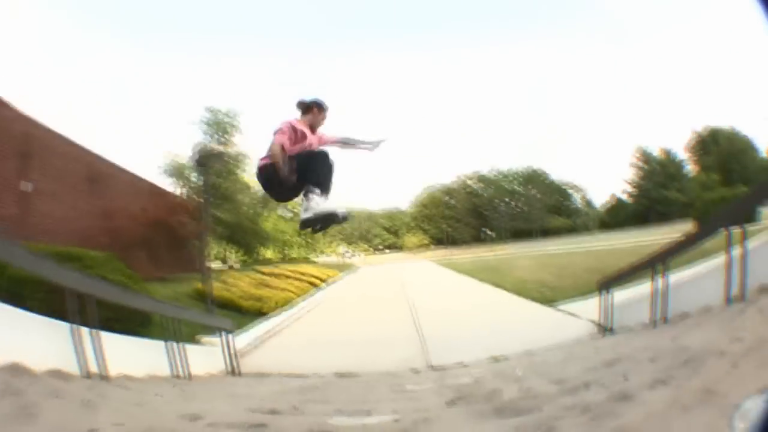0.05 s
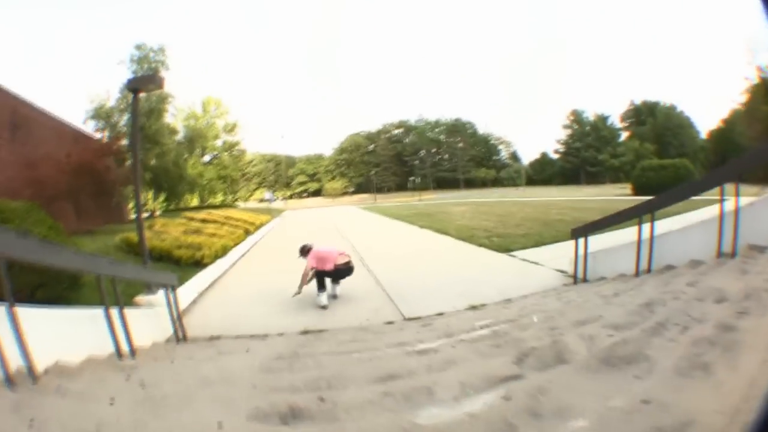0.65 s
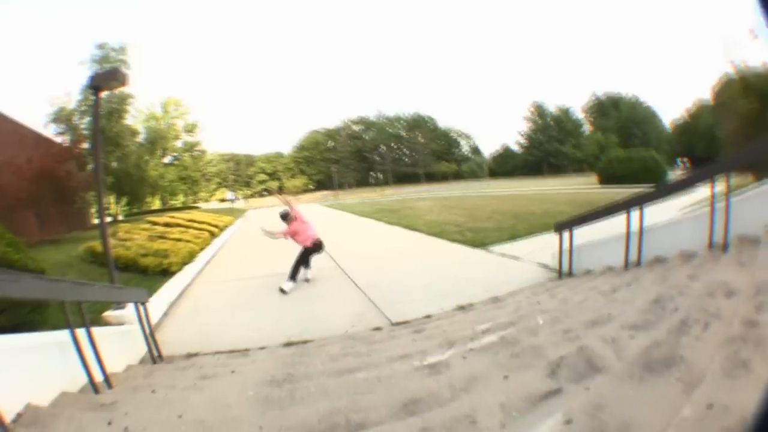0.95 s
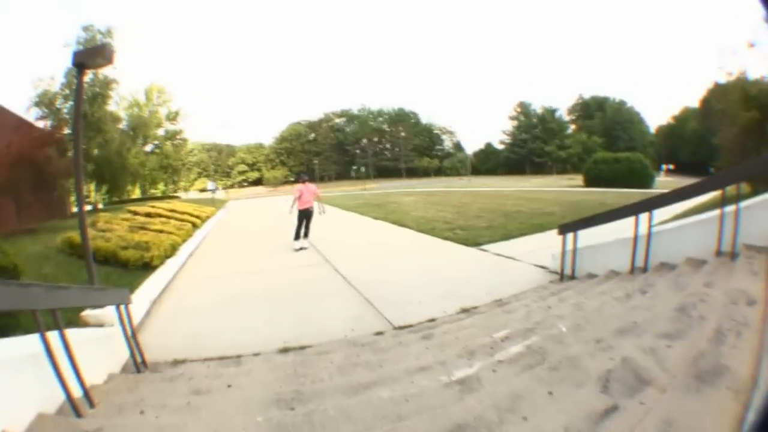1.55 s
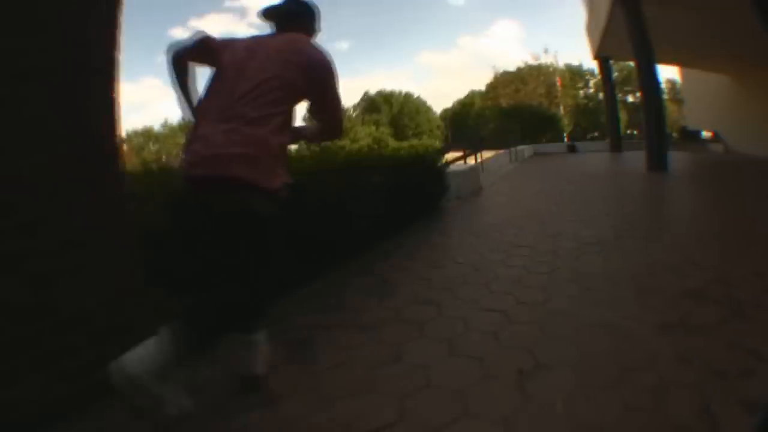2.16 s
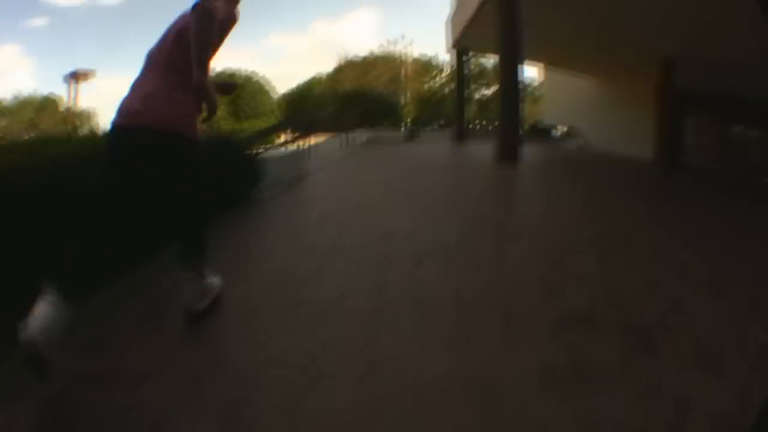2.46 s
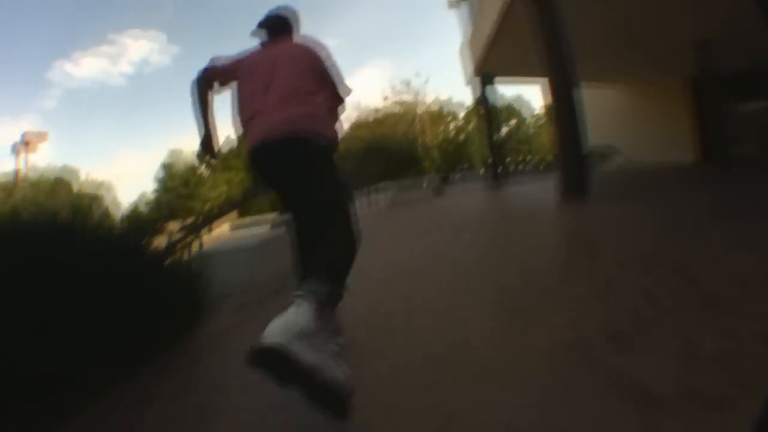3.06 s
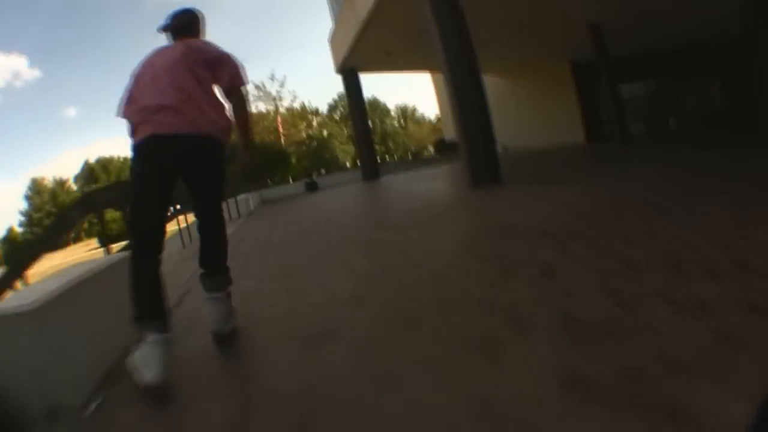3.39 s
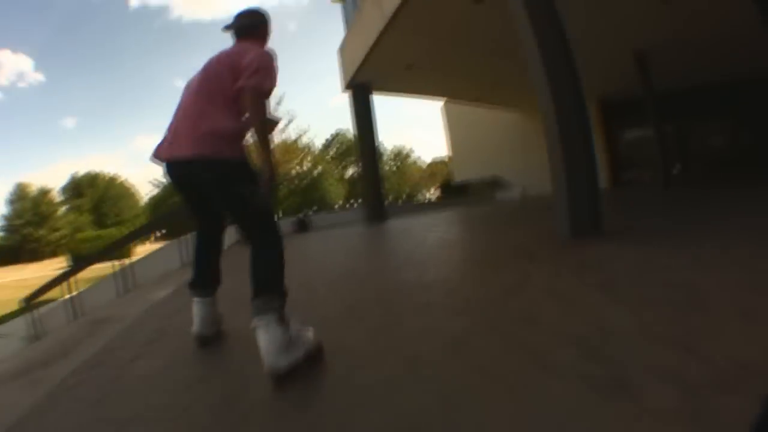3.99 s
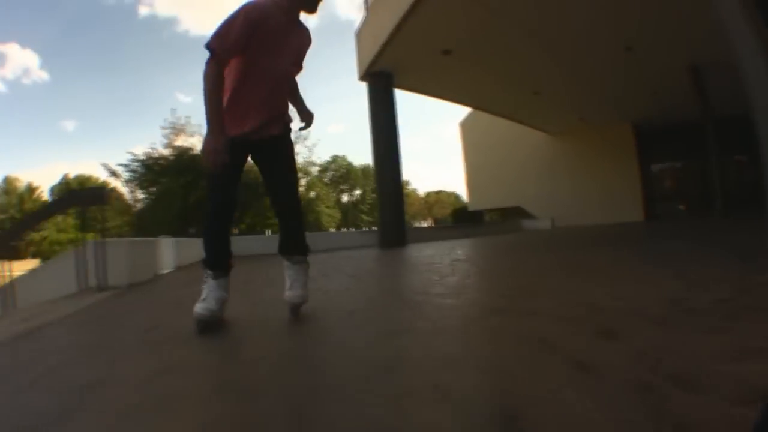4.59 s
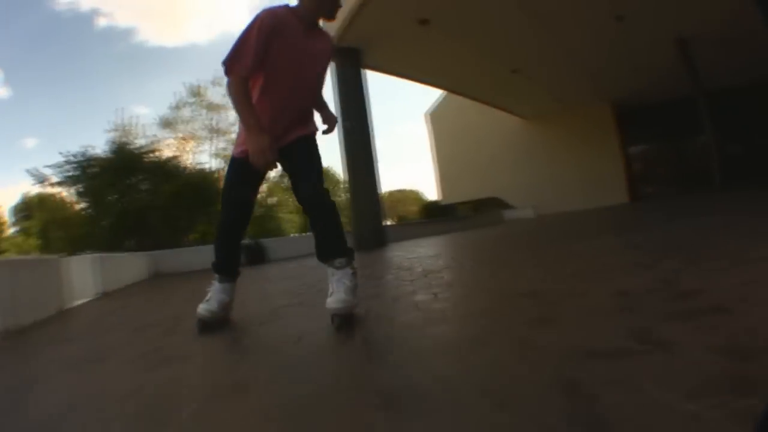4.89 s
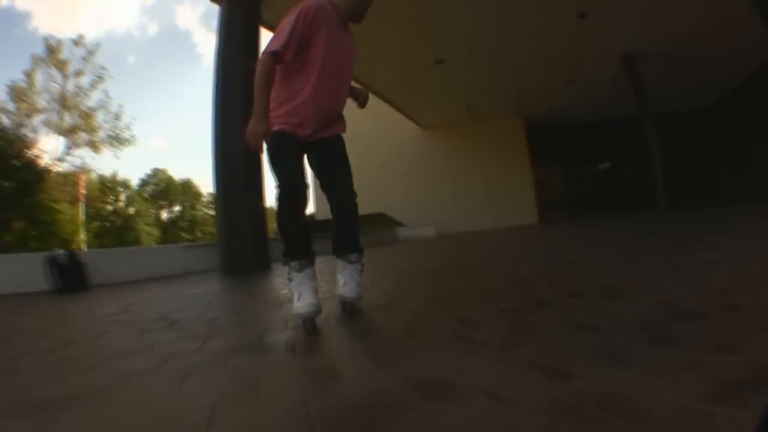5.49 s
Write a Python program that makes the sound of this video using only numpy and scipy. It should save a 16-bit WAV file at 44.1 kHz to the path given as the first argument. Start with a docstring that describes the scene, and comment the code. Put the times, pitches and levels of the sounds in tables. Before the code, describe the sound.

After a hard landing and a short scuff, inline skate wheels fade, then return close, rumbling and clacking over paving joints in gusty air.

```python
"""Skate wheels whirr as an inline skater jumps a flight of concrete steps. He slams down, scuffs a wheel
sideways and rolls away. Then we follow him closely over a paved plaza, where the hard wheels rumble,
knock over joints and crack grit. Puffs of wind buffet each microphone opening on its own,
and the heaviest blows overload the input."""
import sys
import numpy as np
from scipy import signal
from scipy.fft import rfft, irfft, next_fast_len
from scipy.io import wavfile
from scipy.ndimage import map_coordinates

SR = 44100
rng = np.random.default_rng(int(sys.argv[2]) if len(sys.argv) > 2 else 0)


def log_audio(samples):
    """Write samples as a 16-bit WAV file to the path given in sys.argv[1]."""
    # one column per channel
    frames = np.atleast_2d(samples).T
    # limit to full scale, then quantise
    limited = np.clip(frames, -1, 1)
    pcm = np.round(limited * 32767).astype(np.int16)
    wavfile.write(sys.argv[1], SR, pcm)


N = 244314
TIME = np.arange(N) / SR
HIT_TIME = TIME[:SR // 4]
TOUCHDOWN_S, PLAZA_START_S, PUSH_OFF_S = .62, 2.24, 2.278

# tone of a rumbling boot, a clacking frame, a snap at the ground and splintering grit:
# (frequency [Hz], relative level [dB])
RUMBLE_TONE = [(25, -44), (60, -11), (100, -0.5), (200, 4.5), (330, 2.5), (450, -6), (700, -12.5),
               (1500, -57)]
CLACK_TONE = [(150, -12), (450, 13), (900, 8.5), (1400, 6), (1950, 4), (2300, -9.5), (3300, -24),
              (7000, -65)]
SNAP_TONE = [(1500, 7), (2800, 7.5), (4500, -1), (6800, -3.5), (11000, -8.5), (15800, -38)]
SPLINTER_TONE = [(4000, 0), (7000, 1.5), (11500, -0.5), (15800, -24)]
# notes at which a boot rings with weight on it: (pitch [Hz], width [Hz], relative level [dB])
BOOT_NOTES = [(208, 42, -3.5), (408, 86, 2), (633, 77, -0.5), (1035, 86, -9), (1280, 124, -8.5)]


def wheels():
    """Bumps shake boot and frame; the changing load makes rumble, clatter and hiss waver together."""
    # tone of rolling on the steps, the plaza and sand: (frequency [Hz], relative level [dB])
    steps_tone = [(200, -19), (450, 6.5), (750, 11.5), (1100, 9), (1400, 6), (1680, 7), (1900, 6),
                  (2200, -10), (3200, -7), (6000, -39)]
    plaza_tone = [(200, -60), (420, 6.5), (620, 1.5), (950, 2), (1350, -5.5), (1850, -4.5), (2250, -27),
                  (3300, -17), (6000, -73)]
    sand_tone = [(1200, -7.5), (2200, 8), (3100, 1), (4500, -1.5), (5500, -4), (6500, -5), (8000, -7.5),
                 (11000, -8), (13000, -18), (15800, -52)]
    # a skate takes his weight and rumbles: (time [s], length [s], level [dB])
    strides = [(2.28, 0.26, -34.5), (2.71, 0.14, -29), (2.82, 0.047, -32), (2.98, 0.15, -31),
               (3.15, 0.079, -35), (3.24, 0.072, -41.5), (3.58, 0.022, -33), (3.76, 0.0062, -28),
               (3.85, 0.18, -30), (4.26, 0.13, -34), (4.6, 0.1, -31.5), (4.84, 0.94, -34.5)]
    # a turning wheel grinds over sand: (time [s], length [s], level [dB])
    scrapes = [(.67, 0.12, -48), (1.5, 0.035, -46), (1.86, 0.039, -48), (2.4, 0.053, -43),
               (2.8, 0.057, -50)]
    clatter_db = rolling_db()
    load_db = 1.8 * (wobble(45) + .7 * wobble(130))
    slab = stereo(bumps(per_s=600, spread_db=4, texture=1), shape(steps_tone))
    pavers = stereo(bumps(per_s=190, spread_db=4, texture=.7), shape(plaza_tone))
    boots = stereo(bumps(per_s=1400, spread_db=2.5, texture=1), shape(RUMBLE_TONE))
    sand = stereo(bumps(per_s=90, spread_db=4, texture=1.6), shape(sand_tone))
    drive_db = clatter_db + 40  # rumble follows the clatter a little, sand hiss follows it closely
    weight = np.hypot(amp(-47.5 + .25 * drive_db), swells(strides, attack_s=.0026, fade_db_per_s=144))
    grind = np.hypot(amp(-52 + .87 * drive_db), swells(scrapes, attack_s=.01, fade_db_per_s=250))
    rumble = weight * amp(.5 * load_db) * boots
    clatter = amp(clatter_db + load_db) * np.where(TIME < PLAZA_START_S, slab, pavers)
    hiss = grind * amp(.99 * load_db) * sand
    return rumble + clatter + hiss


def rolling_db():
    """Level of the wheels: spinning in the air, coasting into the distance, then driven over the plaza."""
    # how hard the wheels run on the plaza: (time [s], level [dB])
    effort = [(2.25, -30.5), (2.34, -33.5), (2.41, -35), (2.77, -35), (3.17, -47), (3.37, -49.5),
              (3.5, -46.5), (3.74, -37), (4.08, -43.5), (4.24, -42.5), (4.45, -43), (4.79, -41),
              (5.0, -35.5), (5.54, -33.5)]
    start_m, speed_m_per_s = 10.1, 9.4
    flight_db = -37 - 9.5 * TIME  # the free wheels slow down
    distance_m = start_m + speed_m_per_s * np.maximum(TIME - TOUCHDOWN_S, 0)
    coast_db = -37 - 20 * np.log10(distance_m / start_m)
    plaza_db = curves(effort)[0] - .5
    return np.select([TIME < TOUCHDOWN_S, TIME < PUSH_OFF_S], [flight_db, coast_db], plaza_db)


def landing():
    """The wheels slap down and growl up to speed; the loaded boots drone as he crouches."""
    # the wheels' rising growl, and a squeak as one grips: (time [s], pitch [Hz], level [dB])
    growl = [(.612, 225.9, -23), (.619, 264, -6), (.629, 268, -9.5), (.636, 417, -14.5), (.644, 484, -6.5),
             (.652, 613, -14.5), (.662, 640, -22), (.68, 600, -45)]
    squeak = [(.645, 1000, -31), (.67, 1148, -29), (.686, 1230, -23.5), (.71, 1280, -46)]
    # drone of the boots through the crouch: (time [s], level [dB])
    crouch = [(.61, -100), (.622, -7), (.645, -17), (.668, -28.5), (.71, -31.5), (.735, -22.5), (.79, -27),
              (.85, -34), (.905, -32.5), (.935, -46), (1.0, -41.5)]
    # wheel after wheel slaps the concrete: (time [s], level [dB])
    slaps = [(.616, -32), (0.6242, -17.5), (0.6298, -13), (.635, -36.5), (0.638, -28), (0.643, -25),
             (.653, -32.5), (.675, -47)]
    # tone of one slap: (frequency [Hz], relative level [dB])
    slap_tone = [(50, -23), (600, 13), (3300, -0.5), (7000, -3), (15000, -17)]
    grip = stick_slip(growl, jitter=.14, rough_db=2.5) + stick_slip(squeak, jitter=.068, rough_db=5.5)
    drone_db = curves(crouch)[0] - 20.5 * np.maximum(TIME - crouch[-1][0], 0)  # fades after the crouch
    ground = bumps(per_s=1400, spread_db=-4, texture=.68)[0]
    boots = filtered(ground, lambda f: resonances(BOOT_NOTES)(f) / (1 + (f / 2200) ** 4))
    out = np.tile(grip + amp(drone_db) * unit(boots), (2, 1))
    # a brief deep thud as the landing overloads the input
    add(out, .618, amp(-23) * ring(hz=48, decay_s=.05, attack_s=.006))
    for s, slap_db in slaps:
        add(out, s, amp(slap_db) * burst(shape(slap_tone), decay_s=.015, attack_s=.00027))
    add(out, .622, amp(-31) * burst(shape(SNAP_TONE), decay_s=.16, attack_s=.0026))  # the frames rattle
    return out


def knocks():
    """Each blow thumps the boot, clacks the frame and snaps at the ground, which rings wheel and frame."""
    # wheels striking joints and ground:
    # (time [s], thump [dB], clack [dB], snap [dB], clack pitch [Hz], decay [s])
    blows = [(0.102, -36.5, -26.5, -44, 1980, 0.0064), (.279, -40, -42, -55, 1020, 0.023),
             (.473, -35.5, -40, -42, 865, 0.011), (0.729, -37.5, -28, -36.5, 677, 0.16),
             (0.836, -34.5, -33, -33.5, 910, 0.0062), (1.369, -65, -38.5, -72, 856, 0.028),
             (1.384, -41.5, -45, -48, 730, 0.042), (1.533, -57, -33, -39, 1468, 0.045),
             (1.868, -42, -39.5, -40.5, 1380, 0.05), (2.084, -28, -31.5, -39, 896, 0.061),
             (2.183, -35, -43, -47.5, 1020, 0.013), (2.242, -37, -28.5, -31, 950, 0.021),
             (2.278, -31.5, -29.5, -36, 878, 0.045), (2.324, -30.5, -28.5, -52, 674, 0.038),
             (2.423, -25.5, -26.5, -35, 1780, 0.072), (2.505, -33.5, -22.5, -34.5, 966, 0.049),
             (2.651, -29.5, -55, -68, 400, 0.033), (2.709, -20, -23, -35.5, 680, 0.031),
             (2.724, -11.5, -17, -35.5, 477, 0.043), (2.885, -28, -33, -38, 896, 0.033),
             (3.189, -54, -35, -53, 926, 0.028), (3.419, -44, -53, -51.5, 600, 0.021),
             (3.547, -47.5, -33.5, -44.5, 910, 0.05), (3.74, -46, -26, -43.5, 960, 0.013),
             (4.249, -29.5, -28, -40.5, 1020, 0.037), (4.448, -50, -43, -53, 790, 0.0067),
             (4.476, -40, -37, -44.5, 538, 0.14), (4.531, -35.5, -36, -46.5, 794, 0.039),
             (4.589, -35.5, -41, -49.5, 845, 0.008), (4.699, -39, -33, -47, 500, 0.016),
             (4.785, -30.5, -31, -44.5, 622, 0.15), (4.837, -35.5, -29, -52, 600, 0.014),
             (4.892, -41.5, -32.5, -50, 820, 0.033), (4.954, -30.5, -36, -43, 590, 0.025),
             (5.019, -45, -34.5, -52, 850, 0.012), (5.046, -31, -33, -60, 385, 0.035),
             (5.07, -32, -24, -46, 388, 0.013), (5.167, -27.5, -27, -67, 408, 0.049),
             (5.236, -50, -35.5, -61, 2044, 0.023), (5.253, -48, -40, -66, 890, 0.014),
             (5.272, -52, -34.5, -65, 650, .014), (5.322, -39, -35.5, -45.5, 660, 0.025),
             (5.353, -34, -32, -47, 490, 0.025), (5.387, -35, -32, -44, 590, 0.024),
             (5.478, -30, -44, -38.5, 730, 0.039)]
    # dull thump of a boot on solid concrete: (frequency [Hz], relative level [dB])
    slab_tone = [(50, -36), (130, -14), (230, 20), (330, 15), (450, 14), (700, -6), (1500, -65)]
    # notes of wheel and frame: (pitch [Hz], relative level [dB])
    frame_notes = [(1650, -5), (2450, -12.5), (3300, -15.5)]
    out = np.zeros((2, N))
    for s, thump_db, clack_db, snap_db, hz, decay_s in blows:
        decay_s = max(decay_s, .008)
        boot_hz = 280 * amp(-.4 * (thump_db + 31.5) + .5 * rng.standard_normal())  # heavier is deeper
        ground_tone = slab_tone if s < PLAZA_START_S else RUMBLE_TONE
        boot_note = .5 * ring(boot_hz, decay_s, attack_s=.0016)
        thump = boot_note + .95 * burst(shape(ground_tone), 1.34 * decay_s, attack_s=.0015)
        clack_note = .55 * ring(hz, decay_s, attack_s=.002, unsteady=.11)
        clack_tone = peaked(CLACK_TONE, hz, width_hz=.5 * hz, floor=.08)
        clack = clack_note + .92 * burst(clack_tone, decay_s, attack_s=.0014)
        frame = 0
        for note_hz, db in frame_notes:
            gain = amp(db + 2 * rng.standard_normal())
            pitch_hz = note_hz * amp(.28 * rng.standard_normal())
            frame += gain * ring(pitch_hz, decay_s, attack_s=.0015, unsteady=.062)
        snap = .78 * burst(shape(SNAP_TONE), decay_s, attack_s=.0044) + frame
        add(out, s - .001, amp(thump_db) * thump + amp(clack_db) * clack + amp(snap_db) * snap)
    lowest_hz = 64  # a boot is too small to give off much sound below this
    return filtered(out, lambda f: f * f / (f * f - lowest_hz ** 2 - 1j * f * lowest_hz))


def whirr():
    """Until they touch down, the spinning wheels rattle on their bearings."""
    # notes of the free wheels: (pitch [Hz], width [Hz], relative level [dB])
    wheel_notes = [(1165, 147, 7.5), (1920, 160, 7), (2740, 270, -1), (3500, 2400, -12.5)]
    rattle = stereo(bumps(per_s=580, spread_db=.5, texture=.25), resonances(wheel_notes))
    return (TIME < TOUCHDOWN_S) * amp(rolling_db() - 3.5 + 4.8 * wobble(26.9)) * rattle


def scuff():
    """A wheel slides sideways; fast slips ring its plastic."""
    # rise and fall of the slide: (time [s], level [dB])
    slide = [(.96, -56), (.98, -38), (1.045, -30), (1.095, -32), (1.125, -38.5), (1.3, -51), (1.5, -90)]
    # broad notes of the plastic: (pitch [Hz], width [Hz], relative level [dB])
    plastic_notes = [(770, 510, -2), (1570, 520, -1), (2280, 290, 0), (2690, 260, -6.5), (3650, 1100, -10),
                     (6750, 870, -14), (8900, 2900, -18)]
    tone = lambda f: resonances(plastic_notes)(f) * shape([(11500, 0), (14500, -18)])(f)
    return amp(curves(slide)[0]) * stereo(bumps(per_s=2500, spread_db=-.5, texture=.67), tone)


def rasp():
    """The sliding wheel judders and rings; its notes sink as it takes his weight."""
    # narrow notes of the wheel in mid-slide: (pitch [Hz], width [Hz], relative level [dB])
    wheel_notes = [(2230, 32, 1), (2400, 58, -3), (2710, 54, -4), (2970, 60, -12), (3780, 90, -5.5),
                   (4540, 140, -13)]
    # judders of the wheel: (time [s], length [s], level [dB])
    judders = [(.977, 0.016, -39), (1.005, 0.025, -37), (1.035, 0.02, -38), (1.075, 0.023, -52)]
    middle_s, pitch_share_lost_per_s = 1.05, .79
    slips = stereo(bumps(per_s=2600, spread_db=-10, texture=.36), resonances(wheel_notes))
    since_s = np.clip(TIME - middle_s, -.1, .1)
    position = np.cumsum(1 - pitch_share_lost_per_s * since_s)  # reading slower lowers the pitch
    sinking = np.array([map_coordinates(side, [position], mode="wrap") for side in slips])
    return swells(judders, attack_s=.011, fade_db_per_s=260) * amp(1.6 * wobble(140)) * sinking


def scrubs():
    """A wheel set down askew sings with a falling pitch as it swings into line."""
    # short squeals: (time [s], length [s], first pitch [Hz], last pitch [Hz], level [dB])
    squeals = [(2.28, 0.067, 950, 777, -31.5), (2.424, 0.042, 1936, 1764, -34.5),
               (2.515, 0.045, 1013, 667, -32.5), (5.075, 0.088, 547, 375, -36),
               (5.085, 0.073, 694, 517, -33.5)]
    out = np.zeros(N)
    for s, length, first_hz, last_hz, db in squeals:
        course = [(s - .004, first_hz, db - 20), (s, first_hz, db),
                  (s + length, last_hz, db - 3), (s + length + .02, last_hz, db - 30)]
        out += stick_slip(course, jitter=.07, rough_db=4)
    return out


def stick_slip(course, jitter, rough_db):
    """A wheel grips and lets go at an unsteady rate, along (time [s], pitch [Hz], level [dB]) points."""
    hz, db = curves(course)
    phase = 2 * np.pi * np.cumsum(hz * (1 + jitter * wobble(400))) / SR
    touching = (TIME > course[0][0]) & (TIME < course[-1][0])
    return touching * amp(db + rough_db * wobble(300)) * np.sin(phase)


def glide():
    """With his weight on both skates, the paving keeps the boots ringing."""
    # stretches on both skates: (time [s], length [s], level [dB])
    glides = [(5.07, 0.14, -39.5), (5.3, 0.3, -40)]
    boots = stereo(bumps(per_s=520, spread_db=-7, texture=1), resonances(BOOT_NOTES))
    return swells(glides, attack_s=.025, fade_db_per_s=100) * boots


def seams(count=36, spread_db=2):
    """Small seams in the ground click at uneven intervals, louder when the wheels run harder."""
    out, level_db = np.zeros((2, N)), rolling_db()
    for k, (place, size) in enumerate(rng.uniform(-1, 1, (count, 2))):
        s = TOUCHDOWN_S + (TIME[-1] - TOUCHDOWN_S) * (k + .5 + .5 * place) / count
        clack = amp(-3) * burst(shape(CLACK_TONE), decay_s=.014, attack_s=.0006)
        snap = amp(-17) * burst(shape(SNAP_TONE), decay_s=.012, attack_s=.0005)
        add(out, s, amp(np.interp(s, TIME, level_db) + spread_db * size) * (clack + snap))
    return out


def grit():
    """Grains of grit crack under a wheel with a splintering click and a short bright ring."""
    # cracking grains: (time [s], ring level [dB], pitch [Hz], click level [dB])
    grains = [(.075, -46, 4630, -57), (.279, -43.5, 3440, -47), (0.532, -44.5, 4100, -49),
              (1.082, -45, 5000, -55), (1.37, -54, 2500, -47), (1.564, -52, 2700, -51),
              (1.853, -53, 3000, -52), (2.087, -52, 3860, -45), (2.183, -45.5, 3550, -67),
              (2.243, -60, 6500, -56), (2.504, -50, 3920, -61), (2.8, -58, 3000, -52),
              (2.825, -67, 5000, -45), (2.946, -56, 4700, -47.5), (2.98, -51, 3700, -60),
              (3.127, -56, 7400, -57), (3.137, -70, 6000, -64), (3.173, -73, 6500, -66),
              (3.448, -61, 3560, -62), (4.113, -47, 2820, -61.5), (4.421, -48.5, 2870, -56),
              (4.7, -46.5, 4200, -73), (4.895, -41.5, 3850, -48.5), (4.903, -46, 3660, -58),
              (5.019, -46, 3200, -64), (5.074, -47, 3920, -59), (5.189, -48, 3680, -55),
              (5.249, -49.5, 3480, -69), (5.523, -51, 3100, -46)]
    out = np.zeros((2, N))
    for s, ring_db, hz, click_db in grains:
        tone = peaked(SNAP_TONE, hz, width_hz=.2 * hz, floor=.13)
        click = amp(click_db) * burst(shape(SPLINTER_TONE), decay_s=.015, attack_s=.00017)
        add(out, s - .0005, amp(ring_db) * burst(tone, decay_s=.01, attack_s=.00034) + click)
    return out


def sand_pops(count=70, below_wheels_db=19, range_db=6):
    """Tiny grains of sand pop under the wheels at random."""
    out, level_db = np.zeros((2, N)), rolling_db() - below_wheels_db
    for place, softness in rng.uniform(0, 1, (count, 2)):
        s = TOUCHDOWN_S + place * (TIME[-1] - TOUCHDOWN_S)
        pop = burst(shape(SPLINTER_TONE), decay_s=.006, attack_s=.0002)
        add(out, s, amp(np.interp(s, TIME, level_db) - range_db * softness) * pop)
    return out


def walls(x):
    """Steps and building answer with a short, blurred echo."""
    # how long the echo takes to drop 60 dB: (frequency [Hz], decay [s])
    decays = [(150, 0.087), (1000, 0.15), (4000, 0.18), (12000, 0.43)]
    hz, t, noise = signal.stft(rng.standard_normal((2, SR // 2)), SR, nperseg=256)
    tail = signal.istft(noise * amp(-60 * t / along(decays, hz)[:, None]), SR, nperseg=256)[1]
    tail = stereo(tail, np.ones_like) / np.sqrt(tail.shape[1])
    return signal.fftconvolve(x.mean(axis=0)[None], tail, axes=1)[:, :N]


def wind():
    """Steady open air, puffs that swirl differently at each microphone opening, and one low jolt."""
    # tone of the open air and of the swirls: (frequency [Hz], relative level [dB])
    air_tone = [(20, -27), (100, 14), (300, -12), (700, 2), (1500, -25), (3000, -36), (6000, -41),
                (11000, -36), (14000, -50)]
    swirl_tone = [(25, -19), (55, -14), (110, -5), (170, -2), (300, -10.5), (560, -21), (1100, -26.5),
                  (2500, -40.5), (4000, -71)]
    # puffs of wind on the microphone, and one low jolt with the heaviest knock:
    # (time [s], length [s], level [dB])
    buffets = [(.025, 0.036, -26.5), (.105, 0.016, -33.5), (.16, 0.062, -34), (.262, 0.027, -29),
               (.35, 0.032, -27.5), (.45, 0.035, -44), (2.275, 0.065, -32.5), (2.36, 0.29, -36.5),
               (2.71, 0.018, -22.5), (2.83, .16, -26.5), (3.04, 0.25, -37), (3.59, 0.034, -33.5),
               (3.85, 0.22, -31.5), (4.26, 0.15, -34), (4.55, 0.18, -36.5), (5.19, 0.028, -30.5)]
    air = amp(-51.5) * stereo(rng.standard_normal((2, N)), shape(air_tone))
    noise = rng.standard_normal((2, N)) + .43 * rng.standard_normal(N)  # a little is common to both sides
    swirls = unit(filtered(noise, shape(swirl_tone)))
    lumps_db = 2 * np.array([wobble(30), wobble(23)])
    facing_db = 1.03 * np.array([[1], [-1]])  # the left opening faces the wind
    return air + swells(buffets, attack_s=.0022, fade_db_per_s=313) * amp(lumps_db + facing_db) * swirls


def bumps(per_s, spread_db, texture):
    """Two tracks of random bumps of uneven size, over noise for the fine texture of the surface."""
    hits = (rng.random(N) < per_s / SR) * amp(spread_db * np.clip(rng.standard_normal(N), -2, 2))
    return unit(hits * rng.choice([-1, 1], (2, N))) + texture * rng.standard_normal((2, N))


def ring(hz, decay_s, attack_s, unsteady=0):
    """One dying note whose pitch may wander, with the energy of 25 ms at level 1."""
    drift = np.interp(HIT_TIME, np.linspace(0, HIT_TIME[-1], 200), rng.standard_normal(200))
    phase = 2 * np.pi * np.cumsum(hz * (1 + unsteady * drift)) / SR
    wave = np.sin(phase) * hit_fade(decay_s, attack_s)
    return wave / np.sqrt(np.sum(wave ** 2) / (.025 * SR))


def burst(tone, decay_s, attack_s):
    """A dying stereo noise of a given tone, with the energy of 25 ms at level 1."""
    wave = stereo(rng.standard_normal((2, len(HIT_TIME))), tone) * hit_fade(decay_s, attack_s)
    return wave / np.sqrt(np.sum(wave ** 2) / 2 / (.025 * SR))


def hit_fade(decay_s, attack_s):
    """Gain of a hit: it rises quickly and drops 60 dB in decay_s."""
    return amp(-60 * HIT_TIME / decay_s) * (1 - np.exp(-HIT_TIME / attack_s))


def swells(rows, attack_s, fade_db_per_s):
    """Gain of (time [s], length [s], level [dB]) events that rise, hold and die away."""
    gains = []
    for s, length, db in rows:
        rise = np.clip((TIME - s) / attack_s + .5, 0, 1)
        gains.append(rise * amp(db - fade_db_per_s * np.maximum(TIME - s - length, 0)))
    return np.linalg.norm(gains, axis=0)


def stereo(pair, tone):
    """Give two unrelated signals a tone and blend them into left and right, at level 1."""
    # how alike the two sides sound: (frequency [Hz], likeness [-1 to 1])
    likeness = [(200, 0.99), (600, 0.99), (1300, 0.98), (2400, 0.92), (4400, 0.73), (6300, 0.44),
                (8500, 0.057), (14000, -0.54)]
    turn = lambda hz: np.arccos(np.clip(along(likeness, hz), -1, 1)) / 2
    mid, side = filtered(pair, lambda hz: tone(hz) * np.array([np.cos(turn(hz)), np.sin(turn(hz))]))
    return unit(np.array([mid + side, mid - side]))


def filtered(x, tone):
    """Filter x by a tone: a function that gives the gain at each frequency."""
    n = x.shape[-1]
    padded = next_fast_len(n + SR // 8)
    return irfft(rfft(x, padded) * tone(np.fft.rfftfreq(padded, 1 / SR)), padded)[..., :n]


def shape(points):
    """The tone drawn through (frequency [Hz], level [dB]) points."""
    return lambda hz: amp(along(points, hz))


def resonances(notes):
    """The tone of a body that rings at (pitch [Hz], width [Hz], level [dB]) notes."""
    return lambda f: sum((-1) ** k * amp(db) * 1j * f * width / (hz * hz - f * f + 1j * f * width)
                         for k, (hz, width, db) in enumerate(notes))


def peaked(points, hz, width_hz, floor):
    """A drawn tone with one peak at hz; floor is the gain left far from the peak."""
    return lambda f: shape(points)(f) * (floor + abs(resonances([(hz, width_hz, 0)])(f)))


def along(points, hz):
    """Read (frequency [Hz], value) points at hz, with octaves evenly spaced."""
    frequencies, values = np.transpose(points)
    return np.interp(np.log(hz + 1), np.log(frequencies), values)


def curves(rows):
    """One value per sample for each column after the time."""
    times, *columns = np.transpose(rows)
    return [np.interp(TIME, times, column) for column in columns]


def wobble(per_s):
    """A smooth curve through per_s random values a second."""
    return map_coordinates(rng.standard_normal(2000), [TIME * per_s], mode="wrap")


def add(track, s, sound):
    """Mix a sound into the track at s seconds."""
    part = track[:, max(round(s * SR), 0):][:, :sound.shape[-1]]
    part += sound[..., :part.shape[-1]]


def amp(db):
    """Decibels to gain."""
    return 10 ** (np.asarray(db) / 20)


def unit(x):
    """Scale x to an average (rms) level of 1."""
    return x / np.sqrt(np.mean(x ** 2) + 1e-20)


def scene():
    """Skates ahead or a little to the left, in the open air."""
    # where the skater is: (time [s], left over right [dB])
    bearing = [(.3, 1.5), (.55, -0.8), (2.2, 1.5), (2.27, 2.5), (2.85, 3), (3.1, 1.5), (5.54, -0.3)]
    blows = knocks() + seams() + grit() + sand_pops()
    skates = blows + amp(-4) * walls(blows) + landing() + whirr() + wheels() + glide()
    skates = skates + scuff() + rasp() + scrubs()
    pan = amp(curves(bearing)[0] * np.array([[.5], [-.5]]))
    return skates * pan + wind()


def record(dry):
    """The microphone thins the deepest bass, flattens loud peaks and drops the highest treble."""
    low_cut_hz, top_hz = 27, 15850
    ceiling, hardness = .36, 5
    thinned = filtered(dry, lambda hz: 1j * hz / (1j * hz + low_cut_hz))
    clipped = thinned / (1 + np.abs(thinned / ceiling) ** hardness) ** (1 / hardness)
    return filtered(clipped, lambda hz: hz < top_hz)


dry = scene()
out = record(dry)
log_audio(out)
```